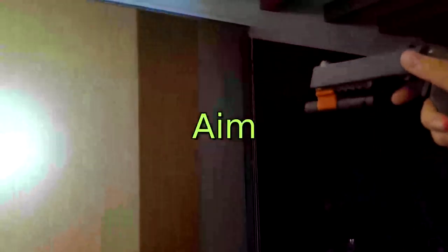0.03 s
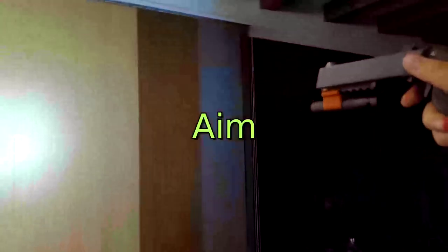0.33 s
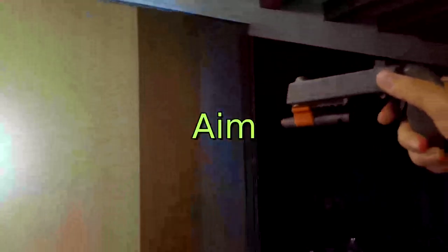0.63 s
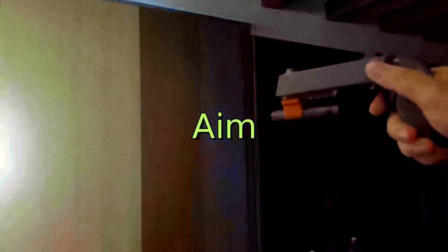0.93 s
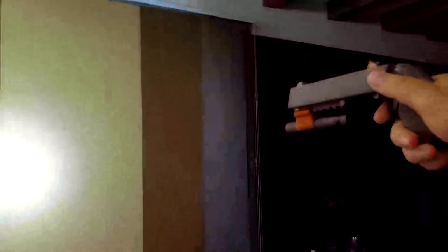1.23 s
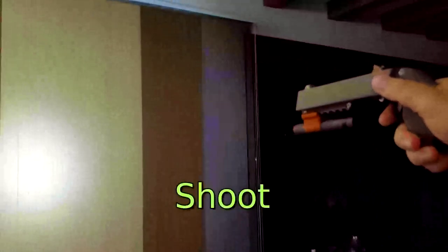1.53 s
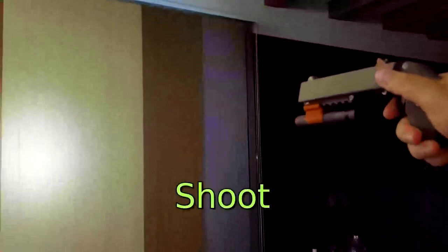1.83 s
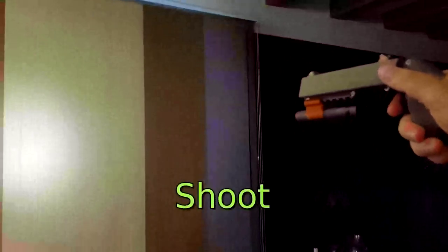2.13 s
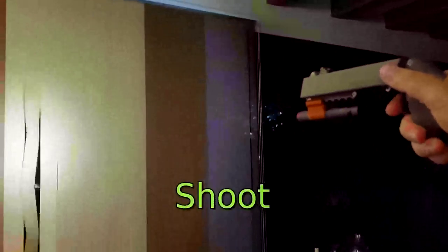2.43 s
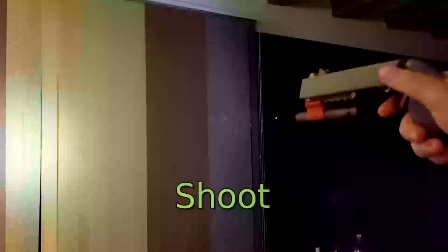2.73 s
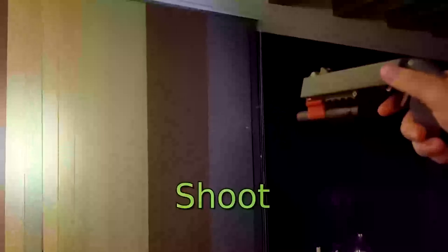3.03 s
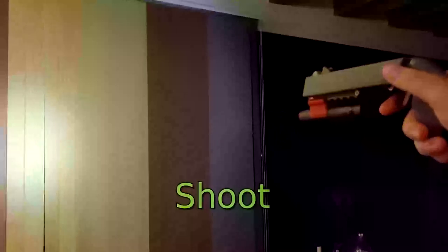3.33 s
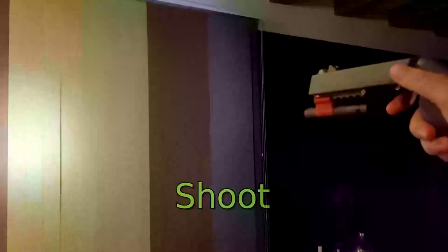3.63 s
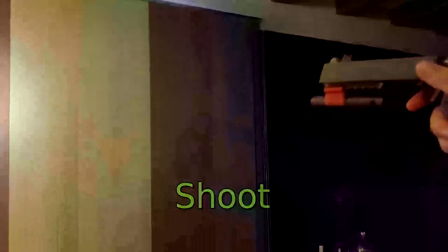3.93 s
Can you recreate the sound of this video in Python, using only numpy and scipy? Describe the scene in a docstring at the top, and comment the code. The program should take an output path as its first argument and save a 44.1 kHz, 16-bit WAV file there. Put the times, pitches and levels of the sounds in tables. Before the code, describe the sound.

After faint hiss and low rumble, a toy pistol snaps and flings a bottle cap. A dull, booming knock on a panel follows, then a ringing metal landing and a quickening rattle, with a short room echo.

```python
"""A quiet, bare room. A hand-held spring launcher snaps in a burst of clicks and flings a
metal bottle cap, which thuds against a panel and sets its low modes booming. The cap tinkles
faintly on its way down, clinks on the floor with a bright ring, bounces once and wobbles to
rest, its rim tapping ever faster. A soft hiss and a low rumble lie underneath."""
import sys
import numpy as np
from scipy import signal
from scipy.fft import rfft, irfft
from scipy.io import wavfile

SR = 44100
rng = np.random.default_rng(int(sys.argv[2]) if len(sys.argv) > 2 else 0)


def transcribe(signal):
    """Save signal, clipped to [-1, 1], as a 16-bit WAV file at the path in sys.argv[1]."""
    frames = np.atleast_2d(signal).T
    limited = np.clip(frames, -1, 1)
    pcm = np.round(limited * 32767).astype(np.int16)
    wavfile.write(sys.argv[1], SR, pcm)


N = 4 * SR
TAIL = np.arange(SR) / SR  # time axis of a one-second decay


def undb(db):
    """Decibels to gain."""
    return 10 ** (np.asarray(db) / 20)


def on_log(points, hz):
    """Read (f, value) points on a log-frequency axis."""
    freqs, values = np.array(points, float).T
    return np.interp(np.log(np.maximum(hz, 1)), np.log(freqs), values)


def fader(points, column=1):
    """Gain over time from one dB column of a table."""
    rows = np.array(points, float)
    return undb(np.interp(np.arange(N) / SR, rows[:, 0], rows[:, column]))


def unit(x):
    """Scale each channel to rms 1."""
    return x / np.sqrt(np.mean(x ** 2, axis=-1, keepdims=True))


def pan(db):
    """Left and right gains that lie db apart; positive leans left."""
    return undb(np.array([[db], [-db]]) / 2)


def add(out, sound, at, db, pan_db=0):
    """Mix in the first second of a sound at a time, rms level and balance."""
    start = int(at * SR)
    placed = unit(sound[:, :SR]) * undb(db) * pan(pan_db)
    out[:, start:start + SR] += placed[:, :N - start]


def click(colour):
    """The tightest click with the given EQ curve."""
    cepstrum = irfft(np.log(undb(on_log(colour, np.arange(SR // 2 + 1)))))
    cepstrum[1:SR // 2] *= 2  # minimum phase packs the energy into the attack
    cepstrum[SR // 2 + 1:] = 0
    return irfft(np.exp(rfft(cepstrum)))[:SR // 10]


def ring(modes, contact_s=0.00097):
    """Modes that build up during the contact and then decay."""
    attack = (1 - np.exp(-TAIL / contact_s)) ** 2
    return attack * sum(undb(db - 60 * TAIL / t60) * np.cos(2 * np.pi * hz * TAIL)
                        for hz, db, t60 in modes)


def stereo_noise(n, likeness):
    """Frequencies and left and right spectra of a partly correlated noise."""
    hz = np.fft.rfftfreq(n, 1 / SR)
    mid, side = rfft(rng.standard_normal((2, n)))
    alike = on_log(likeness, hz)
    mid, side = mid * np.sqrt((1 + alike) / 2), side * np.sqrt((1 - alike) / 2)
    return hz, np.array([mid + side, mid - side])


# the cap's bright partials: f/Hz, face-struck level/dB, rim-struck level/dB, t60/s
CAP_MODES = [(4450, -14, -9, .05), (4545, -1, -4, .06), (4612, 0, -3, .08), (4645, -10, 0, .1),
             (4770, -8, -18, .05), (8020, -26, -48, .12), (8540, -45, -15, .05), (13140, -20, -17, .04),
             (14650, -22, -18, .02)]
def cap_ring(rim, decay_scale=1):
    """Close metal modes shimmer, weighted by where the cap is struck: face (0) to rim (1)."""
    return ring([(hz, face_db + rim * (rim_db - face_db), t60 * decay_scale)
                 for hz, face_db, rim_db, t60 in CAP_MODES])


# EQ of the cap's attack, on its face and on its rim: f/Hz, level/dB
FACE_COLOUR = [(40, -24), (130, -22.5), (230, -15), (470, -9.5), (620, -18.5), (950, -7.5), (1400, -12.5),
               (2400, -4), (3600, 3.5), (4700, 8), (5400, -6.5), (7500, -5.5), (10000, -13), (15000, -13.5)]
RIM_COLOUR = [(60, -37.5), (300, -26), (1000, -28), (2200, -18.5), (3400, -4), (4650, 4), (5150, -29.5),
              (6000, -20), (7200, -29), (8100, -18), (8550, -15.5), (9200, -37.5), (12500, -30.5),
              (13200, -15.5), (13900, -21.5), (14800, -16.5)]
# tinkle, landing and bounce cues: t/s, ring level/dB, click level/dB, rim share/0-1, pan L-R/dB
CAP_HITS = [(2.729, -71.5, -75, 0.2, 1.5), (2.788, -68, -88, 0.2, 0), (3.059, -27, -46.5, 0.03, -0.5),
            (3.065, -30.5, -39, 0.04, -0.5), (3.232, -37, -50, 0.41, 0), (3.264, -36, -48.5, 0.94, -1.5),
            (3.330, -52.5, -59.5, 0.3, 3)]
CAP_RING_DIRECT_DB, CAP_CONTACT_MIX = -5.5, dict(direct_db=-19.5, early_db=-2.5)
def cap_hits():
    """Each contact clicks and sets the cap ringing."""
    out = np.zeros((2, N))
    face_click, rim_click = unit(click(FACE_COLOUR)), unit(click(RIM_COLOUR))
    for at, ring_db, click_db, rim, pan_db in CAP_HITS:
        add(out, room(cap_ring(rim), CAP_RING_DIRECT_DB, early_db=2.5), at, ring_db, pan_db)
        contact = (1 - rim) * face_click + rim * rim_click
        add(out, room(contact, **CAP_CONTACT_MIX), at, click_db, pan_db)
    return out


# fader moves of the wobble: t/s, ring level/dB, rattle level/dB
WOBBLE_LEVELS = [(3.27, -43, -35), (3.37, -36, -49), (3.44, -48, -46.5), (3.49, -34, -40),
                 (3.535, -62, -37.5), (3.56, -64, -56.5), (3.61, -58.5, -70), (3.66, -94, -87.5)]
def cap_wobble(start_hz=55.4, end_hz=170, scatter_db=7.5, timing_jitter=0.26):
    """The crimped rim taps the floor unevenly and ever faster until the cap lies flat."""
    out, taps = np.zeros((2, N)), np.zeros(N)
    start, end = WOBBLE_LEVELS[0][0], WOBBLE_LEVELS[-1][0]
    at = start
    for gap, size in rng.standard_normal((200, 2)):
        if at < end:
            rate = np.interp(at, [start, end], [start_hz, end_hz])
            taps[int(at * SR)] = undb(scatter_db * size) / np.sqrt(rate)
            at += np.exp(timing_jitter * gap) / rate
    for tap_sound, column in (cap_ring(rim=0.94), 1), (click(RIM_COLOUR), 2):
        force = fader(WOBBLE_LEVELS, column)
        chatter = signal.fftconvolve(taps * force, tap_sound)[:N]
        rms = np.sqrt(np.sum(force[int(start * SR):int(end * SR)] ** 2) / N)
        out += rms * unit(room(chatter, **CAP_CONTACT_MIX)[:, :N])
    return out


# the launcher's parts strike in quick succession: t/s, level/dB
SNAP_CLICKS = [(2.2570, -44.5), (2.261, -42), (2.2635, -38), (2.2660, -41.5), (2.2706, -41.5),
               (2.2820, -48)]
# crisp EQ of the snap: f/Hz, level/dB
SNAP_COLOUR = [(25, -13), (55, -20.5), (110, -30.5), (220, -33), (450, -26), (620, -32), (1120, -14),
               (1400, -17), (1900, -4), (2600, -5), (4500, -2), (5600, -5.5), (7400, -13.5), (10000, -16.5),
               (15000, -17)]
# short ring of the launcher's body: f/Hz, level/dB, t60/s
LAUNCHER_MODES = [(1820, -2, .07), (1930, 0, .065), (2085, -6, .06), (2315, -7, .06), (3040, -5, .06),
                  (3180, -1, .06), (3440, -6, .05), (4270, -2, .04)]
# choked pings as the cap is knocked out of its holder: t/s, level/dB
CAP_RELEASE = [(2.266, -40.5), (2.282, -38.5)]
def launcher(direct_db=-14.5, early_db=-3.5, pan_db=-0.5):
    """A burst of clicks from the released spring rings the body and knocks the cap out."""
    out = np.zeros((2, N))
    snap, body = click(SNAP_COLOUR), ring(LAUNCHER_MODES)
    for at, db in SNAP_CLICKS:
        add(out, room(snap, direct_db, early_db), at, db, pan_db)
        add(out, room(body, direct_db, early_db), at, db - 5, pan_db)
    held_cap = cap_ring(rim=0, decay_scale=0.45)
    for at, db in CAP_RELEASE:
        add(out, room(held_cap, CAP_RING_DIRECT_DB, early_db), at, db, pan_db)
    return out


# dull EQ of the blow on the panel: f/Hz, level/dB
THUD_COLOUR = [(20, -40), (45, -20), (70, -7), (130, -13), (330, -1.5), (620, -8), (1200, -6), (3000, -17),
               (4700, -12), (7300, -29.5), (14500, -38)]
# the panel's boom: f/Hz, level/dB, t60/s
PANEL_MODES = [(70.3, -23, .6), (137.9, -17, 0.3), (211, -11.5, .18), (293, -29.5, .08), (318, 5, .08),
               (340, -4, 0.109), (387.5, -13.5, 0.23), (424.1, -19.5, .2), (870, -9, .05),
               (1122, -11, 0.039)]
def panel_thud(at=2.5125):
    """The cap hits the panel with a dull knock that rings its low modes."""
    out = np.zeros((2, N))
    add(out, room(click(THUD_COLOUR), direct_db=-18, early_db=-2.5), at, db=-44.5)
    add(out, room(ring(PANEL_MODES), direct_db=9, early_db=-2.5), at, db=-39, pan_db=-1.5)
    return out


# reverb time of the bare room: f/Hz, t60/s
ROOM_T60 = [(60, .9), (200, 0.97), (330, 0.56), (500, 0.69), (1100, 0.43), (2200, 0.45), (4500, 0.43),
            (8000, .35), (15000, .3)]
# stereo width of reverb and hiss, near mono in the bass, wide in the mids, narrower in the treble:
# f/Hz, L-R correlation (1 is mono)
STEREO_LIKENESS = [(200, 0.86), (340, 0.82), (480, 0.21), (1200, 0.07), (4500, 0.058), (8000, 0.67),
                   (15000, 0.51)]
def room(sound, direct_db, early_db, build_s=0.0018, early_s=0.012):
    """Direct sound and near reflections, set in dB against a tail whose treble dies first."""
    hz, noise = stereo_noise(SR, STEREO_LIKENESS)
    centres, t60s = zip(*ROOM_T60)
    tail = np.zeros((2, SR))
    for weights, t60 in zip(np.eye(len(centres)), t60s):
        band = irfft(noise * on_log(list(zip(centres, weights)), hz))
        tail += band * undb(-60 * TAIL / t60)
    tail *= 1 - np.exp(-TAIL / build_s)
    _, early_noise = stereo_noise(SR, STEREO_LIKENESS)
    early = irfft(early_noise) * np.exp(-TAIL / early_s)
    response = (unit(tail) + undb(early_db) * unit(early)) / np.sqrt(SR)
    response[:, 0] += undb(direct_db)
    return signal.fftconvolve(sound[None], response)


# bass-heavy EQ of the bump: f/Hz, level/dB
BUMP_COLOUR = [(20, 7), (60, 4), (150, -19.5), (600, -39.5), (1100, -23.5), (1700, -59), (5000, -50.5)]
# its cue: t/s, level/dB
BUMPS = [(.818, -68.5)]
def handling_bump():
    """One soft, almost dry bump of handling before the shot."""
    out = np.zeros((2, N))
    for at, db in BUMPS:
        add(out, room(click(BUMP_COLOUR), direct_db=13.5, early_db=-10), at, db)
    return out


# EQ of the two noise beds: f/Hz, level/dB
HISS_COLOUR = [(40, 3.5), (100, 4.5), (250, 3), (550, 2.5), (1500, -3), (4500, -6.5), (5600, -4),
               (7000, -16), (9000, -16), (12000, -7.5), (15000, -15)]
RUMBLE_COLOUR = [(5, -8.5), (15, -1.5), (26, -4), (42, -16), (80, -25.5), (200, -40), (600, -87)]
# their fader moves: t/s, level/dB
HISS_LEVEL = [(0, -66.5), (.7, -73.5), (1.2, -73), (1.8, -76), (2.05, -83.5), (2.24, -83.5), (2.65, -65.5),
              (3.3, -64), (4, -66.5)]
RUMBLE_LEVEL = [(0, -53.5), (.8, -59), (1.3, -62), (1.75, -61.5), (2.049, -72.5), (2.4, -57.5), (3.1, -60),
                (3.9, -54.5)]
# stereo width of the rumble: f/Hz, L-R correlation
RUMBLE_LIKENESS = [(20, 0.35), (70, 0.46)]
def room_tone():
    """Soft hiss and low rumble that sink before the shot and swell back."""
    out = np.zeros((2, N))
    for colour, level, likeness in [(HISS_COLOUR, HISS_LEVEL, STEREO_LIKENESS),
                                    (RUMBLE_COLOUR, RUMBLE_LEVEL, RUMBLE_LIKENESS)]:
        hz, noise = stereo_noise(N, likeness)
        bed = irfft(noise * undb(on_log(colour, hz)))
        out += unit(bed) * fader(level)
    return out


def scene():
    """Snap, thud, landing and wobble over a background that leans slightly right."""
    action = launcher() + panel_thud() + cap_hits() + cap_wobble()
    background = room_tone() + handling_bump()
    return action + background * pan(-1.5)


# balance of the microphone pair: f/Hz, L-R/dB
MIC_BALANCE = [(30, -4), (80, 1), (200, 2), (380, -1), (700, 1), (1300, 0), (2400, -1), (4400, -1.5),
               (8100, -2.5), (13500, 2)]
def record(dry, top_hz=15700):
    """Each microphone adds its own slight colour; a steep low-pass cuts the top."""
    balance_db = on_log(MIC_BALANCE, np.fft.rfftfreq(N, 1 / SR))
    coloured = irfft(rfft(dry) * undb(np.array([balance_db, -balance_db]) / 2))
    low_pass = signal.ellip(10, .2, 80, top_hz, fs=SR, output="sos")
    return signal.sosfilt(low_pass, coloured)


dry = scene()
out = record(dry)
transcribe(out)
```